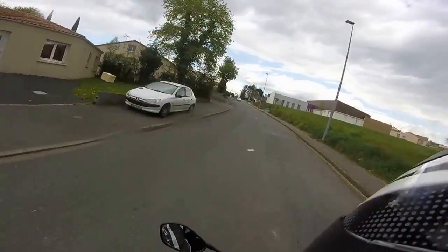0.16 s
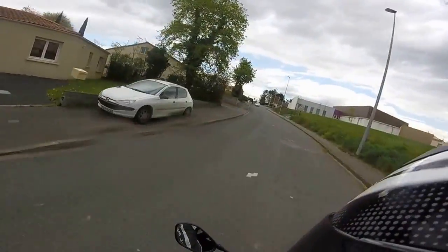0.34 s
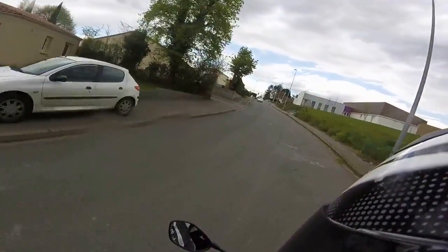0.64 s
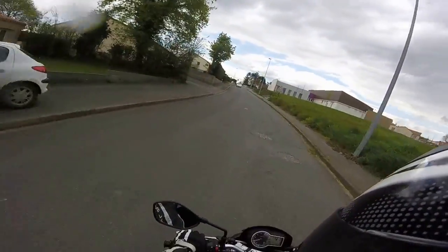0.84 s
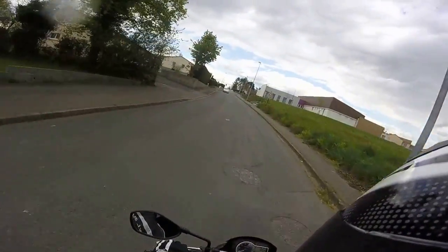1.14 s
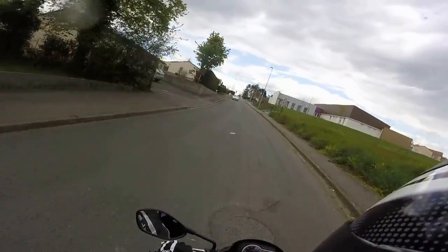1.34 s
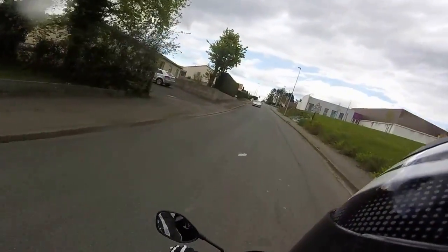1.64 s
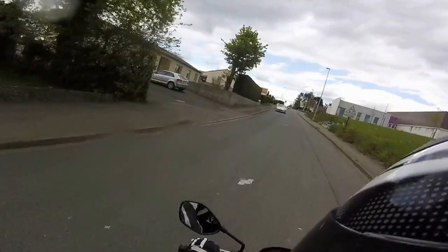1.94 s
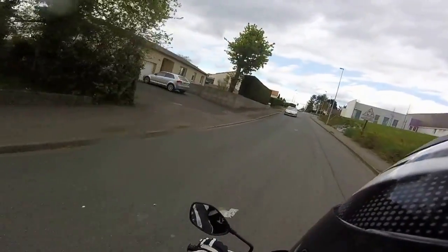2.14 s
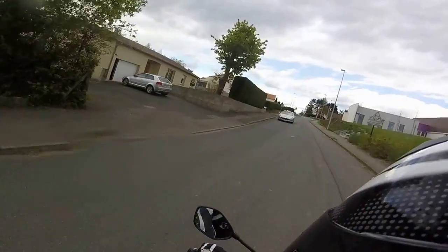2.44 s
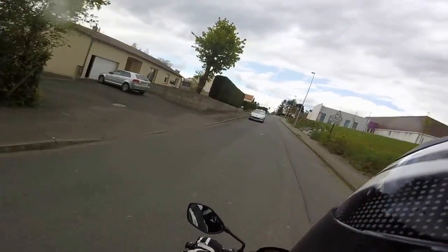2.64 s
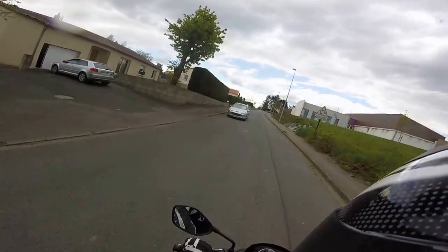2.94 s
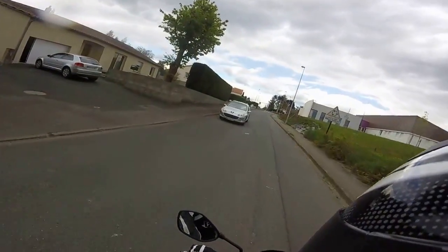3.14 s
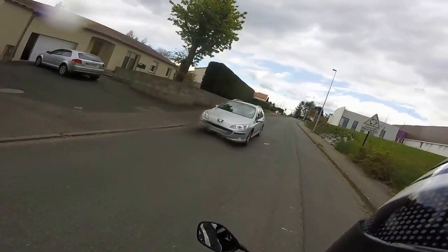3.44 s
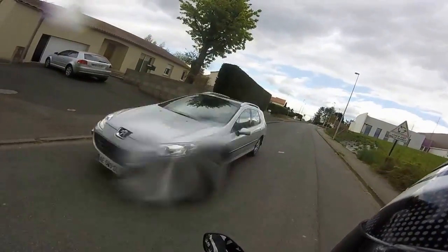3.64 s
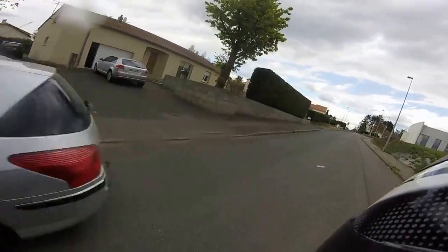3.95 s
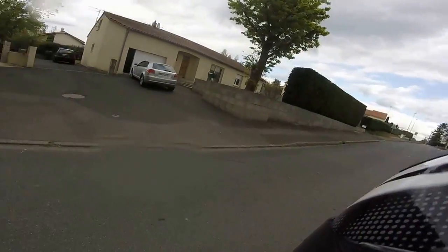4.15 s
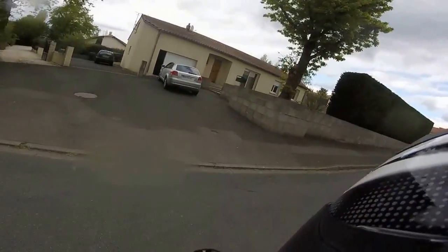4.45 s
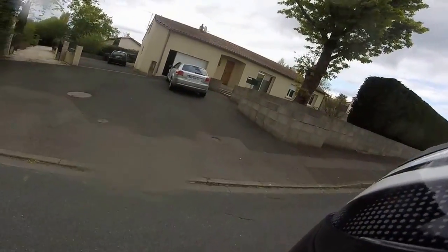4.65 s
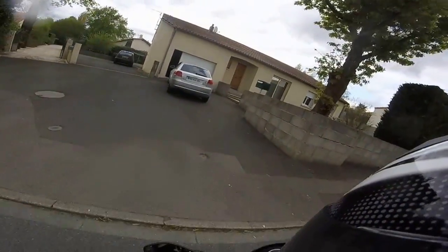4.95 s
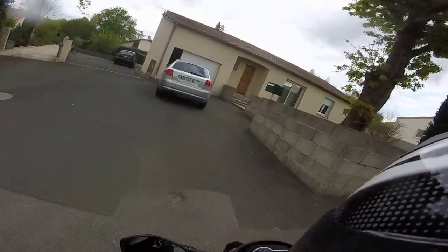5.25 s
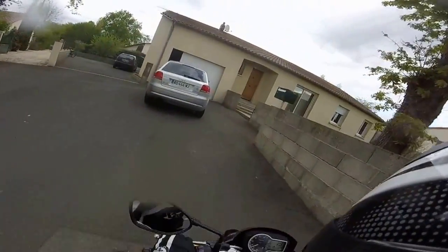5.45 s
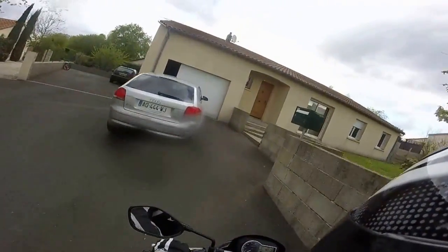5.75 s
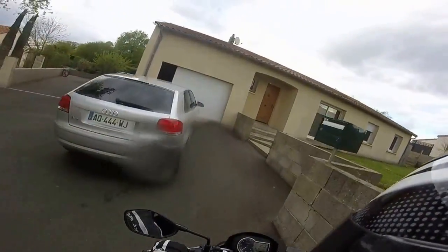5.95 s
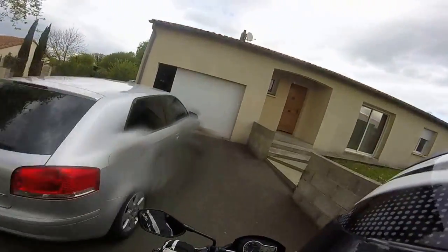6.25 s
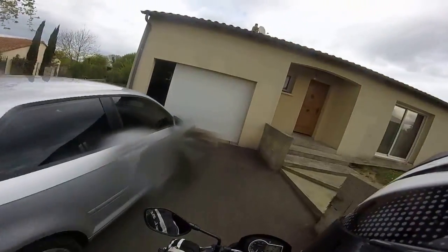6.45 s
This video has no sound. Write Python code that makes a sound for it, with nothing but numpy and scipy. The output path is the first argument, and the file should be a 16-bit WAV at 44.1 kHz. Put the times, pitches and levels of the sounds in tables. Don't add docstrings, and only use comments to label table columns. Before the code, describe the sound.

Helmet-mounted microphone: fading wind hiss, loose engine braking, faint brake squeals, a throttle blip, a car's tyre whoosh, two revs, bumps, then quiet uneven idle.

```python
import sys
import numpy as np
from scipy import signal
from scipy.fft import rfft, irfft, next_fast_len
from scipy.io import wavfile
from scipy.ndimage import uniform_filter1d

SR = 44100
rng = np.random.default_rng(int(sys.argv[2]) if len(sys.argv) > 2 else 0)


def elevation(decibels):
    levels = np.asarray(decibels, float)
    return 10 ** (levels / 20)


def int16_out(signal):
    q = np.round(np.clip(np.atleast_2d(signal).T, -1, 1) * 32767)
    wavfile.write(sys.argv[1], SR, q.astype(np.int16))


N = 290607
T = np.arange(N) / SR

CLUTCH_S = 2.36
IDLE_HZ = 45.21
SHUT_DB = -43
PULSE_LEAN = -1.0


def rms_one(x):
    return x / np.sqrt(np.mean(x ** 2) + 1e-20)


def in_time(rows):
    s, *columns = np.transpose(rows)
    return [np.interp(T, s, column) for column in columns]


def drift(rate):
    r = np.exp(-80 * np.pi * rate / SR)
    steps = rng.standard_normal(N // 40 + 2002)
    slow = signal.lfilter([1], [1, -2 * r, r * r], steps)[2000:]
    return np.interp(np.arange(N) / 40, np.arange(len(slow)), rms_one(slow))


def bell(at_s, wide_s):
    return 1 / (1 + ((T - at_s) / wide_s) ** 2) ** 2


def through(x, response):
    size = next_fast_len(N + SR // 2)
    f = np.arange(size // 2 + 1) * SR / size + 1e-3
    return irfft(rfft(x, size) * response(f), size)[:N]


def shape(points):
    hz, level_db = np.transpose(points)
    return lambda f: elevation(np.interp(np.log(f), np.log(hz), level_db, left=-99, right=-99))


def resonance(f, hz, width):
    return 1j * f * width / (hz ** 2 - f ** 2 + 1j * f * width)


def engine():
    # (time [s], half width [s], level [dB])
    catch_rows = [(1.29, 0.059, 3.5), (1.4, 0.037, 2), (1.6, 0.074, 6), (1.83, .03, 6.5), (2.02, 0.038, 5),
                  (2.07, .03, -5.5), (2.15, 0.01, 4), (2.321, 0.016, 6.5), (2.41, .03, 6),
                  (2.55, 0.014, 1.5), (5.83, .02, 3), (5.9, 0.11, 6), (5.97, .02, -3), (6.03, 0.035, 11),
                  (6.07, 0.023, -4), (6.26, .025, -6), (6.4, 0.038, 3), (6.461, 0.012, -1)]
    per_s, upper_db = throttle()
    clean, scatter_db, opened, pull, idling = combustion(per_s, upper_db)
    turns = np.cumsum(per_s / SR * (1 + .004 * scatter_db * drift(12)))
    turns -= turns[round(3.038 * SR)] % 1 - 1
    angle = 2 * np.pi * turns
    strength = firing_strength(turns, scatter_db)

    swing_db = (upper_db - SHUT_DB) * opened
    low = low_orders(per_s, angle, swing_db, pull, scatter_db)
    idle_throb = elevation(-53) * idling * strength * np.cos(3 * angle + PULSE_LEAN)
    puffs = strength * exhaust_puffs(per_s, angle, upper_db)
    upper = np.sqrt(clean) * puffs + elevation(2.5) * np.sqrt(1 - clean) * loose_gas(scatter_db)
    catch_db = sum(db * bell(s, wide_s) for s, wide_s, db in catch_rows)
    exhaust = np.sqrt(2) * (low + idle_throb) + elevation(upper_db - 1.64 + catch_db) * upper
    return exhaust, angle, upper_db


def throttle():
    # (time [s], firing rate [Hz], exhaust level [dB])
    blip_rows = [(2.98, 45.2, -52), (3.016, 65.2, -33), (3.048, 80.4, -29), (3.075, 76.8, -31),
                 (3.115, 75.5, -35.5), (3.145, 74.3, -48), (3.2, 56.8, -46.5), (3.37, 47.65, -47.5),
                 (3.78, 42.77, -47.5)]
    rev_one_rows = [(4.021, 55.27, -43), (4.079, 72.1, -30.5), (4.15, 65.5, -33), (4.22, 84.2, -30.5),
                    (4.459, 115.9, -24), (4.521, 119.8, -27), (4.59, 112, -29), (4.728, 73.5, -40.5),
                    (4.829, 59.4, -45)]
    rev_two_rows = [(4.9, 68.45, -38), (5.079, 95.9, -29), (5.209, 111.3, -26), (5.298, 114.6, -27),
                    (5.559, 107, -29.5), (5.759, 94.1, -35.5), (5.82, 77.73, -49.5), (5.92, 69.76, -48),
                    (6.089, 47.06, -54)]
    idle_db = -48
    per_s, level_db = in_time([*blip_rows, *rev_one_rows, *rev_two_rows])
    start, end = blip_rows[0][0], rev_two_rows[-1][0]

    pulled = np.clip((T - CLUTCH_S) / .28, 0, 1) ** 1.5
    coast = 172.9 * np.exp(-T / 2.62) * (1 - pulled) + (IDLE_HZ - 1.5) * pulled
    coast_db = (-36.5 - 4.0 * T) * (1 - pulled) + idle_db * pulled
    hunt_hz, hunt_s = 2.5, .245
    idle = IDLE_HZ + hunt_hz * np.cos(2 * np.pi * (T - end - .07) / hunt_s)

    phases = [T < start, T > end]
    per_s = np.select(phases, [coast, idle], per_s)
    level_db = np.select(phases, [coast_db, idle_db], level_db)
    return uniform_filter1d(per_s, size=600), uniform_filter1d(level_db, size=200)


def combustion(per_s, level_db):
    declutched = T > CLUTCH_S
    opened = np.clip((level_db - SHUT_DB) / 11, 0, 1) * declutched
    slowing = -uniform_filter1d(np.gradient(per_s), size=2000) * SR
    braking = np.clip(slowing / 20, 0, 1) * np.clip((per_s - IDLE_HZ) / 20, 0, 1)
    fast = np.clip((per_s - 100) / 10 + .5, 0, 1)

    def mix(idle, slow, quick):
        return idle + braking * (slow + fast * (quick - slow) - idle)

    loose = mix(idle=.36, slow=.8, quick=.68) ** (1 - opened) * .024 ** opened
    scatter_db = mix(idle=2.5, slow=4.2, quick=1.1) * (1 - opened) + 1.1 * opened
    pull = np.tanh(-slowing / 120) * declutched
    return 1 - loose, scatter_db, opened, pull, (1 - braking) * (1 - opened)


def firing_strength(turns, scatter_db):
    misfire_s = [3.063, 3.089, 3.128]
    firing = (turns + .4).astype(int)
    weak = np.isin(firing, firing[(np.array(misfire_s) * SR).astype(int)])
    dealt_db = scatter_db * rng.standard_normal(N // 40)[firing] - 11 * weak
    dealt_db += .8 * (firing % 2)
    return uniform_filter1d(elevation(dealt_db), size=90)


def low_orders(per_s, angle, swing_db, pull, scatter_db):
    # (pitch [Hz], level [dB])
    first_rows = [(30, -48), (45, -49), (70, -43.5), (95, -38.5), (120, -36.5), (145, -42), (180, -30.5)]
    second_rows = [(60, -70), (90, -49), (140, -55), (185, -45.5), (215, -37.5), (260, -34.5), (360, -32.5)]
    first = shape(first_rows)(per_s) * elevation(0.033 * swing_db + 3.5 * pull)
    second = shape(second_rows)(2 * per_s) * elevation(0.13 * swing_db + 5 * pull)
    first *= elevation(0.37 * scatter_db * drift(16))
    second *= elevation(1.08 * scatter_db * drift(19))
    return first * np.cos(angle + PULSE_LEAN) + second * np.cos(2 * angle + PULSE_LEAN)


def exhaust_puffs(per_s, angle, upper_db):
    # (pitch [Hz], level [dB])
    pipe_rows = [(60, -7), (130, -25.5), (225, 2), (285, -5.5), (348, -0.6), (400, -3.5), (460, -16.5),
                 (575, -17), (690, -32.5), (800, -48), (1100, -60), (3200, -94)]
    hz = np.arange(1., 3200)
    gain = shape(pipe_rows)(hz)
    soft = np.clip((-38.5 - uniform_filter1d(upper_db, size=4000)) / 8, 0, 1)
    bass = 2.0 / (1 + (hz / 270) ** 6) + 1.15 / (1 + (hz / 165) ** 6) - .4
    puffs = 0
    for k in range(3, 16):
        order_hz = (k * per_s).astype(int)
        level = gain[order_hz] * (1 + 1.14 * soft * bass[order_hz])
        puffs = puffs + level * np.cos(k * angle + PULSE_LEAN)
    return puffs * np.sqrt(per_s / 70)


def loose_gas(scatter_db):
    gas = rng.standard_normal(N) * elevation((1.1 + .35 * scatter_db) * drift(9))
    return rms_one(through(gas, pipe))


def pipe(f):
    # (pitch [Hz], width [Hz], level [dB])
    ring_rows = [(129, 89, -9), (224.5, 25, 5), (343.4, 14.4, -5.5), (498, 24, -15.5)]
    rings = sum(elevation(db) * resonance(f, hz, width) for hz, width, db in ring_rows)
    return np.abs(rings) / np.sqrt(1 + (f / 554) ** 10)


def air(angle, load_db):
    # (pitch [Hz], level per Hz [dB])
    hiss_rows = [(280, 3), (480, -34), (537, -8), (595, -11.5), (803, -13), (891, -12.5), (1190, -8.5),
                 (1440, 2.5), (1490, 3), (1940, -8.5), (2310, -8), (3460, -8), (4500, -28.5), (5850, -86),
                 (9900, -120)]
    top_rows = [(2530, -18), (4300, -7), (4440, -19.5), (4690, -3.5), (4890, -2), (5030, 0), (5640, -7),
                (6150, 1.5), (6600, -5), (6930, -16.5), (7780, -10), (8310, -9.5), (8760, -13.5),
                (10100, -19), (11500, -25.5), (15000, -38), (22000, -120)]
    sway_db, buffet_db = gusts()
    case_db, wind_db, top_db = hiss_levels(load_db)

    def noise(response):
        return rms_one(through(rng.standard_normal(N), response))

    def below(f):
        return 1 / (1 + (f / 1950) ** 8)

    sway = noise(lambda f: resonance(f, 49.4, 9.1) ** 2)
    buffet = noise(lambda f: resonance(f, 7.3, 25.4) ** 2)
    spectrum = ringing(hiss_rows)
    case = noise(lambda f: spectrum(f) * np.sqrt(below(f)))
    wind = noise(lambda f: spectrum(f) * np.sqrt(1 - below(f)))
    top = noise(ringing(top_rows))

    hiss = elevation(case_db + .9 * drift(12) + .8 * drift(40)) * case
    hiss += elevation(wind_db + .8 * drift(12) + drift(40)) * wind
    hiss += elevation(top_db + .7 * drift(12)) * top
    beat = 1 + 0.039 * np.cos(angle - 1.2)
    rush = elevation(-1.53 + 0.67 * drift(5.9)) * beat * hiss
    return elevation(sway_db - 13.5) * sway + elevation(buffet_db - 9.5) * buffet + rush


def gusts():
    # (time [s], mount sway [dB], buffeting [dB])
    gust_rows = [(0, -19, -29), (.3, -20.5, -26), (.43, -16.5, -39), (.62, -14.5, -27), (.81, -38, -21.5),
                 (1.009, -21, -28), (1.2, -36, -25), (1.32, -22.5, -28), (1.5, -32, -25), (1.74, -28, -35),
                 (1.82, -33, -17.5), (2.03, -45, -28), (2.11, -24, -38), (2.33, -25, -39),
                 (2.5, -29.5, -32), (2.7, -50, -37), (2.97, -22.5, -42), (3.19, -21, -37), (3.63, -31, -39),
                 (3.85, -48, -34), (4.02, -39, -45), (4.22, -42, -32), (4.75, -45, -37), (5.08, -39, -39),
                 (5.3, -32, -32), (5.541, -31, -18), (5.69, -18, -42), (5.85, -45, -33),
                 (6.039, -25.5, -51), (6.33, -44, -31.5)]
    s, *levels = np.transpose(gust_rows)
    coarse_s = np.arange(0, N, 64) / SR
    away_db = 105 * np.abs(coarse_s - s[:, None])
    out = []
    for db in levels:
        loudest_db = (db[:, None] - away_db).max(axis=0)
        out.append(np.interp(T, coarse_s, np.maximum(loudest_db, -36.5)))
    return out


def hiss_levels(load_db):
    # (time [s], level [dB])
    flow_rows = [(0, 3), (.14, 0.5), (.35, -3.5), (.7, -6), (.95, -8.5), (1.2, -12), (1.6, -13),
                 (1.9, -13.5), (2.05, -14), (2.5, -22), (2.75, -18), (3.4, -18.5), (4.75, -18.5),
                 (5.2, -15), (5.52, -16), (5.85, -14), (6.29, -21.5), (6.44, -22.5)]
    # (air [dB], share of flow [ratio], valve gear [dB], passing car [dB])
    mix_rows = [(-37, 0.78, -44, -38), (-37.5, 1.044, -51.5, -61.5), (-51.5, 0.78, -63, -78)]
    # (time [s], half width [s], level [dB])
    grit_rows = [(1.0, .2, -55), (3.88, 0.16, -60.5), (5.45, 0.23, -56), (6.42, 0.097, -61)]
    grit_mix = [0, 2.4, 0]
    full_dbs = [-3.5, 9, 9]

    flow_db, = in_time(flow_rows)
    gear_db = 0.49 * (uniform_filter1d(load_db, size=3000) + 24.5)
    gear_db = np.where(T > CLUTCH_S, gear_db, -40)
    near = bell(4.046, 0.34)
    grit = sum(elevation(2 * db) * bell(s, wide_s) for s, wide_s, db in grit_rows)
    levels = []
    for (air_db, share, valve_db, tyre_db), grit_db, full_db in zip(mix_rows, grit_mix, full_dbs):
        power = elevation(2 * (air_db + share * np.minimum(flow_db, full_db)))
        power = power + elevation(2 * (valve_db + gear_db))
        power = power + elevation(2 * tyre_db) * near + elevation(2 * grit_db) * grit
        levels.append(10 * np.log10(power))
    return levels


def ringing(spectrum):
    # (pitch [Hz], width [Hz], level [dB])
    mode_rows = [(529, 11, -4), (905, 13, 3), (1687, 97, -10.5), (2265, 41, 1), (2865, 38, -8.5),
                 (6040, 67, -4)]

    def response(f):
        modes = sum(elevation(db) * np.abs(resonance(f, hz, width)) ** 2 for hz, width, db in mode_rows)
        return shape(spectrum)(f) * (1 + modes)
    return response


def car():
    # (pitch [Hz], width [Hz])
    roar_band = (1100, 910)
    # (pitch [Hz], width [Hz], level [dB])
    tread_rows = [(1150, 45, -10), (1445, 46, 12), (1730, 70, -7)]
    level_s = 3.92
    closing_m_s, pass_m = 16, 2.5

    def tyre(f):
        broad = resonance(f, *roar_band) ** 2 + elevation(-1.0) * resonance(f, 1310, 360) ** 2
        return broad + sum(elevation(db) * resonance(f, hz, width) ** 2 for hz, width, db in tread_rows)

    from_peak = T - 3.876
    spread_s = np.where(from_peak < 0, 0.29, 0.17)
    level = elevation(-41.5) / (1 + (from_peak / spread_s) ** 2) ** 1.53
    roar = through(rng.standard_normal(N), tyre)
    sent = T - np.hypot(pass_m, closing_m_s * (T - level_s)) / 343
    lag = 2.175 / 1000 / np.sqrt(1 + ((T - level_s) / 0.24) ** 2)
    heard = np.interp(sent, T, roar) + 0.46 * np.interp(sent - lag, T, roar)
    return level * elevation(-0.5) * rms_one(heard)


def clicks():
    # (time [s], peak [dB], top end [dB], rattle length [s])
    click_rows = [(.877, -29, -30, .005), (1.328, -35, -28, .005), (1.676, -31, -30, .006),
                  (1.695, -34, -17, .007), (1.7415, -28, -36, .006), (1.776, -30, -34, .006),
                  (1.896, -32, -28, .005), (1.920, -18, -30, .004), (2.544, -39, -27, .005),
                  (2.8625, -31, -34, .005), (3.916, -34, -31, .005), (3.97, -36, -30, .005),
                  (4.012, -29, -33, .005), (4.08, -34, -24, .005), (4.1845, -30, -35, .005),
                  (4.308, -35, -34, .005), (5.016, -33, -30, .005), (5.064, -35, -28, .005),
                  (5.195, -31, -33, .005), (5.315, -33, -20, .006), (5.518, -27, -33, .018),
                  (5.557, -35, -18, .005)]
    # (pitch [Hz], level [dB], time to die by 60 dB [s])
    frame_rows = [(537, -13.5, 0.072), (927, -24.5, 0.096), (1520, -12.5, 0.04), (2233, -20.5, 0.12)]
    # (pitch [Hz], level per Hz [dB])
    knock_rows = [(180, -29), (300, 2), (1010, -11.5), (1400, 0.5), (1690, -4), (2280, -3.5), (2610, -7),
                  (3170, -6), (4360, -27), (5980, -26.5), (7000, -62), (9100, -64), (15400, -120)]
    out, t = np.zeros(N + 8192), np.arange(8192) / SR
    f = np.arange(4097) * SR / 8192 + 1e-3
    for s, peak_db, top_db, length in click_rows:
        rise = np.maximum(t - .002, 0) / max(length / 4, 1e-4)
        swell = rise * np.exp(-rise)
        spectrum = rfft(rng.standard_normal(len(t)) * swell)
        even = irfft(spectrum / np.abs(spectrum))
        struck = rfft(np.sqrt(swell) * even)
        body = irfft(struck * shape(knock_rows)(f))
        tick = irfft(struck * resonance(f, 7000, 3500) ** 2)
        click = body / np.abs(body).max() + elevation(top_db + 3.5) * tick / np.abs(tick).max()
        for hz, db, t60 in frame_rows:
            click += elevation(db - 60 * t / t60) * (1 - np.exp(-rise)) * np.sin(2 * np.pi * hz * t)
        out[round((s - .002) * SR):][:len(t)] += elevation(peak_db + 2) * click
    return out[:N]


def jolts():
    # (time [s], level [dB], swing [Hz])
    jolt_rows = [
        (1.795, -22.5, 26),
        (5.289, -27, 22.1),
        (5.52, -14.5, 21.8),
    ]
    out, t = np.zeros(N), np.arange(SR // 4) / SR
    for s, db, hz in jolt_rows:
        out[round(s * SR):][:len(t)] -= elevation(db) * np.sin(2 * np.pi * hz * t) * np.exp(-t * hz / 0.97)
    return out


def brake():
    # (time [s], half width [s], pitch [Hz], level [dB])
    squeal_rows = [
        (1.31, .07, 1600, -47),
        (1.42, .035, 1500, -48),
        (1.55, .08, 1428, -47),
        (1.75, .06, 1290, -52),
    ]
    waver_hz, patchy_db = 9 * drift(15), 2.5 * drift(12)
    out = np.zeros(N)
    for s, wide_s, hz, db in squeal_rows:
        pitch = hz + waver_hz - 150 * (T - s)
        swell = np.exp(-((T - s) / wide_s) ** 4)
        out += elevation(db + patchy_db) * swell * np.cos(2 * np.pi * np.cumsum(pitch) / SR)
    return out


def scene():
    exhaust, angle, load_db = engine()
    mix = exhaust + air(angle, load_db) + car() + clicks() + jolts() + brake()
    return mix[None]


def top_cut(x):
    return signal.sosfilt(signal.butter(12, 15170, fs=SR, output="sos"), x)


def record(dry):
    # (pitch [Hz], level per Hz [dB])
    self_rows = [(3820, -33), (6500, -22), (6870, -6), (8130, -7), (9360, -10), (10100, -8.5),
                 (15400, -12.5)]
    noise = rms_one(through(rng.standard_normal(N), shape(self_rows)))
    floor = elevation(-75.5 + 1.2 * drift(9.0)) * noise
    low_pass = signal.cheby2(12, 60, 15900, fs=SR, output="sos")
    return top_cut(signal.sosfilt(low_pass, dry + floor))


dry = scene()
out = record(dry)
int16_out(out)
```